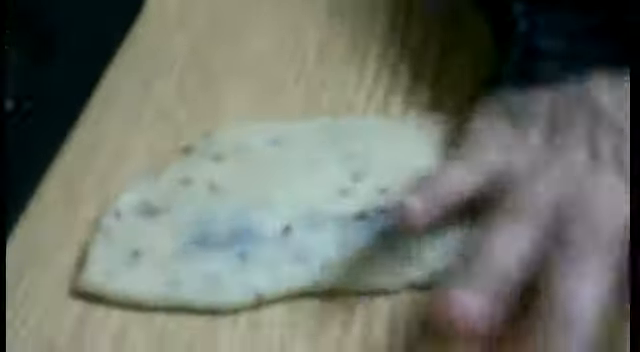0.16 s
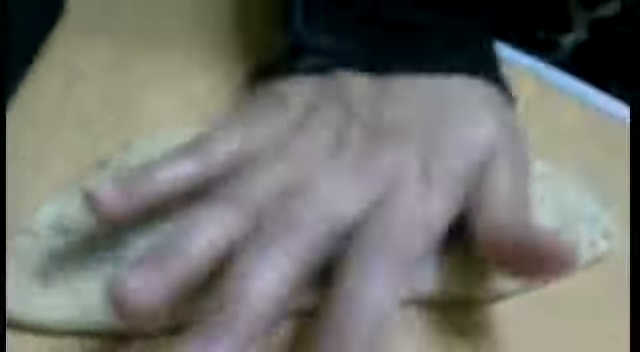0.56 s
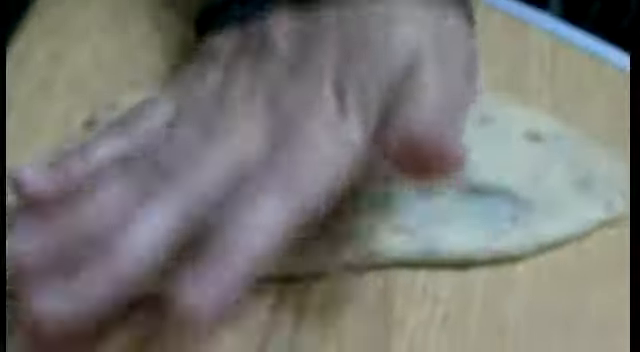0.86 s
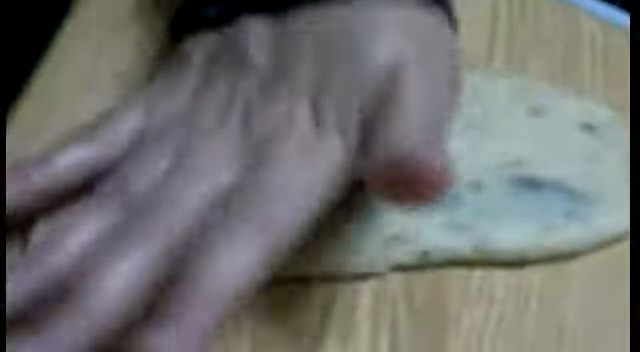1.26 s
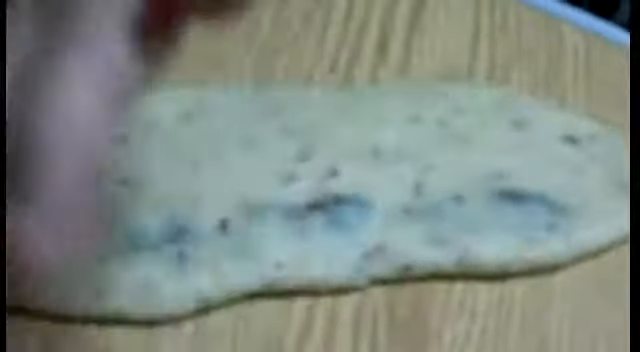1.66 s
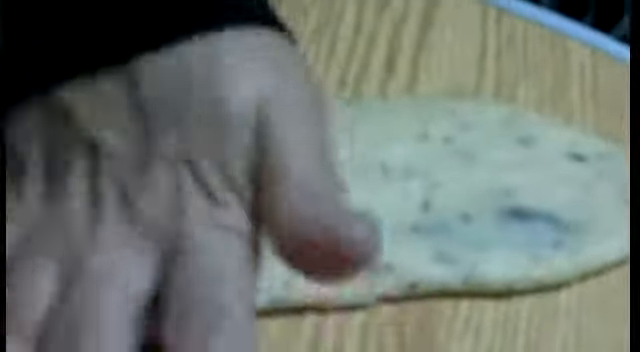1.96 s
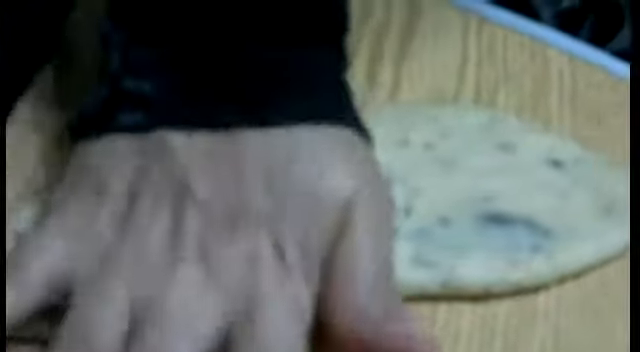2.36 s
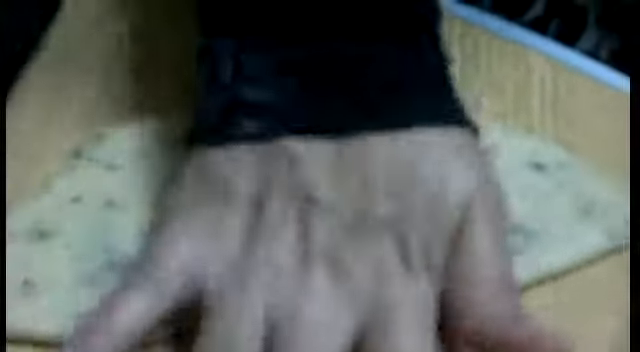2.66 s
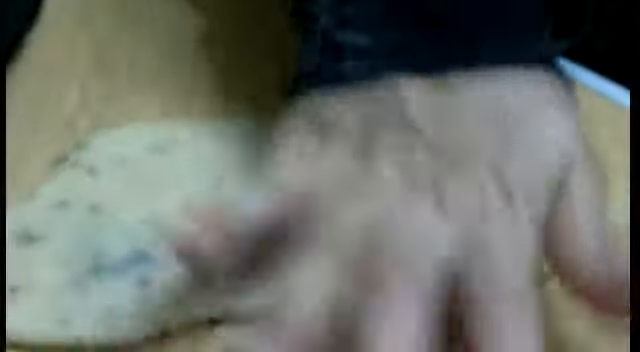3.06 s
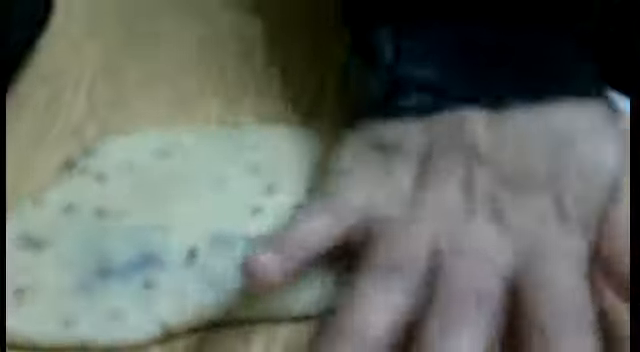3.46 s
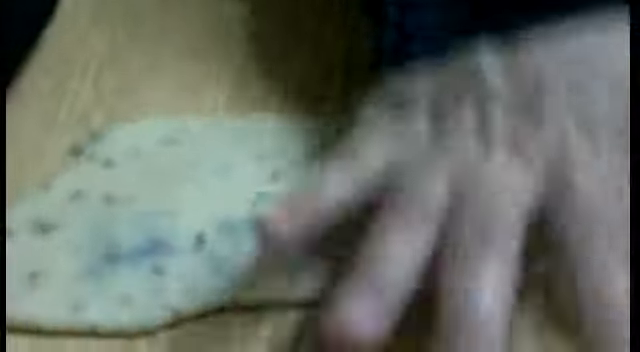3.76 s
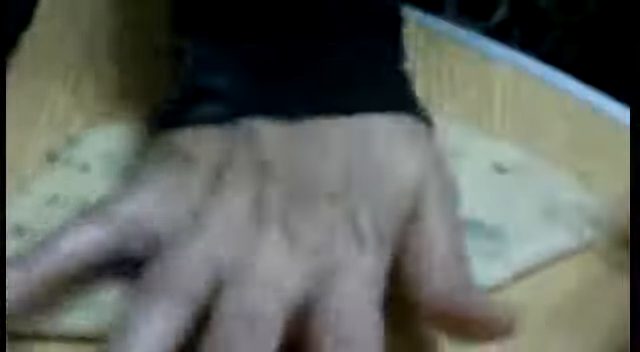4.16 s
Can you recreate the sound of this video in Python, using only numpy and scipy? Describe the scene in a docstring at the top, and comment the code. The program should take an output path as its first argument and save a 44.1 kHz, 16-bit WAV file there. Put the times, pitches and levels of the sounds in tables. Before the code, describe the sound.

A palm pats dough flat on a wooden board, about four times a second, heard close and mostly on the right in a small kitchen with short reverberation. From the start to about 0.8 seconds come four firm pats. Each is a low thud with a soft squash and a brief papery rub, doubled by a wooden knock or sharp clack as the board rocks on the worktop. From about 1 to 2.4 seconds the hand presses gently, giving quieter, duller thumps, faint ticks and a light rasp of skin over flour. At about 2.5 seconds a fingertip click and a strong slap bring back the hard patting, with six knocking, clacking pats up to about 3.9 seconds. A softer pat follows at around 4.1 seconds. Only very faint room noise lies underneath.

```python
"""A palm pats dough flat on a wooden board, about four times a second, in a small kitchen.
Each pat thuds, squashes the dough and rubs by stick-slip friction. The board rocks on the worktop and
rings in its modes: its heavy side knocks, and sharp clacks come mostly from its light edge, twice from
a fingertip. The hand presses gently through the middle stretch, then pats hard again.
Two close microphones hear it with short reverberation; the right one is much the louder."""
import sys
import numpy as np
from scipy import signal
from scipy.fft import rfft, irfft
from scipy.io import wavfile
from scipy.ndimage import uniform_filter1d, minimum_filter1d

SR = 44100
rng = np.random.default_rng(int(sys.argv[2]) if len(sys.argv) > 2 else 0)


def inscribe(sig):
    """Save sig as 16-bit PCM at rate SR to the path in sys.argv[1].

    A 1-D sig is mono; a 2-D sig holds one channel per row.
    Samples are clipped to [-1, 1] before scaling.
    """
    pcm = np.round(np.clip(np.atleast_2d(sig).T, -1, 1) * 32767)
    wavfile.write(sys.argv[1], SR, pcm.astype(np.int16))


N = 189559

# The pats. Each row: landing time, rocking-back time and stay in seconds, then levels in dB of
# landing force, rocking force, weight, landing rub, rocking rub, slide, fingertips and lift.
PATS = [(-.05, 0.0145, 0.043, -1, -5.5, 2, -20.5, -26, -19, -43, -51),
        (0.2174, 0.2819, 0.044, 5, -0.5, -3.5, -24, -27.5, -11, -32, -49),
        (0.4548, 0.5134, 0.052, 3, -0.5, -4.5, -23, -25.5, 0, -24.5, -48),
        (0.7017, 0.745, 0.067, -2.5, -8.5, -0.5, -36, -27, -15.5, -39.5, -64),
        (0.9604, 1.015, 0.0062, -31, -17.5, 4, -36.5, -37.5, -11, -43.5, -60),
        (1.141, 1.213, .035, -23.5, -17, 0.5, -43.5, -44.5, -38, -57, -66),
        (1.398, 1.4257, 0.019, -29, -17.5, 1.5, -45.5, -40.5, -40, -52, -67.5),
        (1.7574, 1.8487, 0.0059, -23.5, -14.5, 1.5, -44, -30, -11.5, -51.5, -68),
        (1.996, 2.0727, 0.027, -30.5, -12, -4.5, -43, -37, -16.5, -46, -53.5),
        (2.263, 2.3439, 0.018, -21, -8.5, 1, -35.5, -29.5, -13.5, -32, -66),
        (2.5334, 2.5938, 0.048, 6.5, -5, -1, -27, -24, -4, -29.5, -32.5),
        (2.784, 2.8512, 0.04, -2, -1, 0.5, -31, -28, -10.5, -29.5, -40.5),
        (3.0543, 3.1206, 0.041, 0, -2, 0.5, -33.5, -37, -21, -32.5, -40),
        (3.3101, 3.3732, 0.041, -1, -1, -3, -29, -32.5, -15.5, -28, -39),
        (3.5503, 3.613, 0.044, -3, -2.5, -1, -33.5, -38.5, -19, -31.5, -42.5),
        (3.8255, 3.8889, 0.046, -5, 1.5, -0.5, -33.5, -29.5, -24, -30.5, -58),
        (4.076, 4.1788, 0.019, -11, -15, 0, -37.5, -34.5, -18, -43, -79.5)]
# Friction spectrum of skin on dough. Each row, as in every spectrum here: frequency in Hz, level in dB.
RUB_SPECTRUM = [(200, -68.5), (900, 5.5), (1500, 10.5), (2100, 10.5), (2700, 8), (3300, -14.5), (4400, -31),
                (5500, -32), (8000, -46), (14000, -48)]


def undb(db):
    """Amplitude ratio for a level in decibels."""
    return 10 ** (np.asarray(db) / 20)


def unit(x):
    """Normalisation to an rms of 1."""
    return x / np.sqrt(np.mean(x ** 2))


def through(x, response):
    """A linear system convolves its input with its impulse response."""
    return signal.fftconvolve(x, response)[:len(x)]


def colour(spectrum, size=4096):
    """Minimum-phase impulse response of a spectrum, by folding the cepstrum onto positive time."""
    hz, db = np.transpose(spectrum)
    grid_hz = np.maximum(np.arange(size // 2 + 1) * SR / size, 1)
    magnitude = undb(np.interp(np.log(grid_hz), np.log(hz), db))
    cepstrum = irfft(np.log(magnitude))
    cepstrum[1:size // 2] *= 2
    cepstrum[size // 2 + 1:] = 0
    return irfft(np.exp(rfft(cepstrum)))


def noise(spectrum):
    """White noise filtered to a spectrum, at an rms of 1."""
    return unit(through(rng.standard_normal(N), colour(spectrum)))


def ring(modes):
    """Modal superposition: the impulse itself plus one damped cosine for each mode."""
    t = np.arange(SR // 2) / SR
    response = signal.unit_impulse(len(t))
    for hz, resonance_db, t60 in modes:
        rate = np.log(1000) / t60
        response += undb(resonance_db) * 2 * rate / SR * np.exp(-rate * t) * np.cos(2 * np.pi * hz * t)
    return response


def add(track, start_s, sound):
    """Superposition of a sound on a track."""
    i = int(np.clip(start_s * SR, 0, len(track) - 1))
    track[i:i + len(sound)] += sound[:len(track) - i]


def pressure(start, length, rise, fall, brush_db=-17, brush_s=0.014):
    """Contact pressure envelope, times in seconds: the hand brushes, bears down, holds and lets go."""
    t = np.arange(N) / SR - start
    brush = undb(brush_db) * np.exp(np.minimum(t, 0) / brush_s)
    release = np.exp(-np.maximum(t - length, 0) / fall)
    return np.maximum(np.clip(t / rise, 0, 1), brush) * release


def stick_slip(spread_db, rate_hz):
    """Stick-slip friction modulates amplitude at random, many times a second."""
    steps = np.clip(rng.standard_normal(N // 20), -1.5, 1.5)
    flicker = np.interp(np.arange(N) * rate_hz / SR, np.arange(len(steps)), steps)
    return unit(undb(spread_db * flicker))


def soften(x, cutoff_hz):
    """Contact time limits bandwidth: a softer contact lasts longer and acts as a low-pass."""
    return signal.sosfilt(signal.butter(4, min(cutoff_hz, 9000), fs=SR, output="sos"), x)


def disperse(x, centre_hz=1300, width_hz=1100):
    """Dispersion: bending waves cross the wood at different speeds, spreading a pulse (an all-pass)."""
    radius = np.exp(-np.pi * width_hz / SR)
    poles = np.array([1, -2 * radius * np.cos(2 * np.pi * centre_hz / SR), radius ** 2])
    return signal.lfilter(poles[::-1], poles, x)


def impacts(hits, pulse, rattle_db, rattle_s, typical_hz=3600):
    """Impact with rebound: tiny bounces follow each blow and last longer after a soft one."""
    track, t = np.zeros(N), np.arange(len(pulse)) / SR
    for start, db, cutoff_hz in hits:
        blow = soften(pulse, cutoff_hz)
        settle_s = rattle_s * typical_hz / cutoff_hz
        rebounds = rng.standard_normal(len(t)) * np.sqrt(t) * np.exp(-t / settle_s)
        rattle = through(blow, rebounds / np.linalg.norm(rebounds))
        add(track, start, undb(db) * (blow + undb(rattle_db) * rattle) / np.abs(blow).max())
    return track


def pushes(landing_share=0.48):
    """Load transfer: each pat pushes twice, as the palm lands and as it rocks back."""
    # Each row: knock time and hold in seconds, then force, weight, rub and slide in dB.
    rows = []
    for lands, rocks, stays, land_db, rock_db, weight_db, land_rub_db, rock_rub_db, slide_db, *_ in PATS:
        land_hold = landing_share * (rocks - lands)
        land_slide_db = slide_db - 7.5 + 0.4 * land_db  # less slide on landing, least when soft
        rows.append((lands, land_hold, land_db, weight_db, land_rub_db, land_slide_db))
        rows.append((rocks, stays, rock_db, weight_db + 0.5, rock_rub_db, slide_db))
    return rows


def microphone_hiss():
    """Self-noise: each of the two microphones adds its own uncorrelated hiss."""
    hiss_spectrum = [(20, 1.5), (200, 2), (1500, 4.5), (6000, -2.5), (11000, -7), (15000, -21)]
    return undb(-73) * np.array([noise(hiss_spectrum), noise(hiss_spectrum)])


def room_air():
    """Ambient noise: a steady floor, strongest in the low bass."""
    air_spectrum = [(20, -9.5), (50, 9), (100, -12), (160, -9), (230, -11), (600, -15.5), (1200, -20),
                    (2500, -41), (5000, -40), (11000, -56), (15000, -38)]
    return undb(-68) * noise(air_spectrum)


def suppress(x, crossover_hz=250, open_db=-36, slope=0.68, depth_db=-9):
    """Downward expansion: a noise suppressor turns down all but the bass while the sound is quiet."""
    bass = signal.sosfiltfilt(signal.butter(2, crossover_hz, fs=SR, output="sos"), x)
    upper = x - bass
    level = np.sqrt(np.abs(uniform_filter1d(upper ** 2, size=441)))
    return bass + upper * np.clip((level / undb(open_db)) ** slope, undb(depth_db), 1)


def left_microphone(x, lead_samples=10.5):
    """Path difference: the nearer microphone hears early; it is weak and has a rumble of its own."""
    spectrum_re_right = [(30, -9.5), (98, -15.5), (160, -17.5), (260, -16), (450, -18.5), (1100, -18),
                         (1830, -17), (3000, -21), (5000, -12.5), (12000, -15)]
    rumble_spectrum = [(20, 0.5), (90, -4.5), (200, -16), (500, -26), (2000, -48)]
    weak = suppress(through(x, colour(spectrum_re_right)))
    early = np.interp(np.arange(N) + lead_samples, np.arange(N), weak)
    return early + undb(-58.5) * noise(rumble_spectrum)


def kitchen(x, first_echo_s=0.011):
    """Diffuse reverberation: reflections off walls and cupboards decay exponentially, treble first."""
    # Each row: lower and upper band edge in Hz, 60 dB decay time in seconds, level in dB.
    bands = [(39.4, 310, 0.31, -11.5), (300, 1010, 0.36, -8), (1100, 2450, 0.31, -12),
             (2520, 48000, 0.049, -9)]
    t = np.arange(SR // 2) / SR
    response = np.zeros(len(t))
    for low_hz, high_hz, t60, db in bands:
        tail = rng.standard_normal(len(t)) * np.exp(-np.log(1000) * t / t60) * (t > first_echo_s)
        band = signal.butter(3, [low_hz, min(high_hz, 0.45 * SR)], "band", fs=SR, output="sos")
        response += undb(db) * signal.sosfilt(band, tail / np.linalg.norm(tail))
    return through(x, response)


def board_response():
    """Resonance: board and worktop ring in their normal modes."""
    # Each row: frequency in Hz, gain at resonance in dB, 60 dB decay time in seconds.
    modes = [(36.3, -1.5, 0.3), (101.5, 15, 0.28), (119.2, 6.5, 0.3), (195.2, 8, 0.25), (255.5, -3.5, .14),
             (344.4, -1.5, 0.37), (490, -6, 0.075), (567, 0.5, 0.026), (833, 8, 0.08), (922, -6, 0.43),
             (1050, 4, 0.084), (1354, -9.5, 0.089), (1773, -29.5, 0.33), (2070, -7, 0.14),
             (2860, -3.5, 0.015), (3280, -2.5, 0.12), (4004, -4.5, .08), (4080, -15, 0.3)]
    return ring(modes)


def lifts(board, delay_s=0.009):
    """Adhesion: skin peels off the dough in small slips as the hand rises."""
    peel = sum(undb(lift_db) * pressure(rocks + stays + delay_s, 0.022, rise=0.0086, fall=0.012)
               for _, rocks, stays, *_, lift_db in PATS)
    friction = noise(RUB_SPECTRUM) * stick_slip(spread_db=7, rate_hz=670)
    return peel * unit(through(friction, board))


def fingertips(lead_s=0.018):
    """Light impact: fingertips flick the dough ahead of the palm, each time a short noise burst."""
    touch_spectrum = [(60, -15), (250, -4), (900, 7), (2400, 9), (3200, -17.5), (4500, -17.5), (6000, -28),
                      (12000, -31.5), (15000, -32.5)]
    flicks = sum(undb(touch_db) * pressure(lands - lead_s, 0, rise=0.0012, fall=0.01, brush_db=-32)
                 for lands, *_, touch_db, _ in PATS)
    return flicks * noise(touch_spectrum)


def slides(board, lag_s=0.002):
    """Sliding friction over flour: a papery rasp through the board and a fine hiss above it."""
    rasp_spectrum = [(500, -35.5), (2200, -13), (3300, 18), (4200, 1.5), (5200, 1.5), (6200, -7.5),
                     (7300, -6), (8800, -34), (14000, -60.5)]
    hiss_spectrum = [(3000, -30), (6000, -6), (7300, -2), (8800, -18), (10300, -4), (11000, -9), (12200, 0),
                     (13200, -12), (14000, -27), (16000, -35)]
    rasp_gain, hiss_gain = np.zeros((2, N))
    for knock, hold, *_, slide_db in pushes():
        speed = pressure(knock + lag_s, hold, rise=0.007, fall=0.0037)
        rasp_gain += undb(-36 + slide_db) * speed
        hiss_gain += undb(-48 + 1.7 * slide_db) * speed
    slips = stick_slip(spread_db=4, rate_hz=400)
    rasp = rasp_gain * unit(through(noise(rasp_spectrum) * slips, board))
    return rasp + hiss_gain * noise(hiss_spectrum) * slips


def clacks():
    """Sharp impacts: mostly the board's light edge, twice a fingertip clicking just before a pat."""
    # Each row: start in seconds, level in dB, contact cutoff in Hz. Fingertips: 0.204 and 2.5196 s.
    hits = [(0.0767, -22, 2700), (0.092, -18.5, 2480), (0.204, -12.5, 2770), (0.2374, -6.5, 4000),
            (0.469, -4.5, 3440), (0.7217, -5.5, 3680), (0.7432, -5, 5100), (0.9525, -21.5, 2670),
            (0.993, -23, 3800), (1.1648, -15.5, 2240), (1.1786, -23.5, 4080), (1.7819, -20, 2000),
            (2.0236, -19.5, 2100), (2.282, -23, 2780), (2.5196, -12.5, 4270), (2.5489, -5, 3900),
            (2.584, -12.5, 5000), (2.6808, -11.5, 4300), (2.8008, -5.5, 3700), (2.8338, -14.5, 3600),
            (3.0728, -6.5, 3700), (3.3277, -13.5, 2910), (3.358, -16.5, 3900), (3.5646, -12.5, 3500),
            (3.8443, -9.5, 3060), (3.8764, -22, 3440)]
    clack_spectrum = [(25, -31), (300, 3.5), (700, 0), (1050, 0.5), (1500, 4.5), (2800, 3.5), (3600, 0),
                      (4500, -8), (5600, -13.5), (8000, -24.5), (14000, -37)]
    mode_hz, mode_db, mode_t60 = 1830, 8, 0.0047
    pulse = through(colour(clack_spectrum), ring([(mode_hz, mode_db, mode_t60)]))
    return impacts(hits, pulse, rattle_db=1, rattle_s=0.0022)


def knocks(brisk_hz=3800, brisk_rub_db=-33.5, octaves_per_db=0.1075):
    """Contact chatter: the heavy side lands several times; a brisk push rubs more and knocks brighter."""
    # Each row: delay in seconds, level in dB, contact cutoff in Hz.
    chatter = [(0, 0, 9000), (.00245, -7, 9000), (.00295, -5, 4000), (.00392, 0, 1500)]
    knock_spectrum = [(25, -4), (100, -0.5), (450, 9.5), (750, 3), (1050, 4.5), (1500, 4), (2100, 6.5),
                      (2800, -3), (4000, -13.5), (5500, -27), (8000, -35.5), (14000, -28)]
    contact = colour(knock_spectrum)
    pulse = np.zeros(len(contact))
    for delay, db, cutoff_hz in chatter:
        add(pulse, delay, undb(db) * soften(contact, cutoff_hz))
    hits = [(start, force_db, brisk_hz * 2 ** (octaves_per_db * (rub_db - brisk_rub_db)))
            for start, _, force_db, _, rub_db, _ in pushes() if start >= 0]
    return undb(-1) * disperse(impacts(hits, pulse, rattle_db=-5.5, rattle_s=0.0031))


def palm(board):
    """Forced vibration: soft weight, squashing dough and rubbing skin drive the board."""
    # Slow presses that do not rock the board. Each row: start and length in seconds, force and rub in dB.
    nudges = [(0.136, 0.038, -23, -42), (0.754, 0.031, -16, -50), (1.293, 0.056, -35, -75),
              (1.48, 0.022, -38, -75), (2.022, 0.056, -34, -63), (2.671, 0.048, -24, -34.5)]
    thud_spectrum = [(20, -46), (35, 3.5), (62, -4.5), (100, -3.5), (145, 0.5), (210, 6), (330, 0),
                     (600, -3), (1500, -57.5), (4000, -80)]
    squash_spectrum = [(60, 7.5), (250, -43), (450, -9.5), (620, 12.5), (850, -3), (1300, 10),
                       (2200, -15.5), (5000, -78.5)]
    scuff_spectrum = [(1500, -25), (2600, -5), (3300, 0), (3800, -4), (4250, -1), (4700, -15), (5400, -32),
                      (8000, -44), (14000, -50)]
    presses = [(start, length, force_db, 0, rub_db) for start, length, force_db, rub_db in nudges]
    for knock, hold, force_db, weight_db, rub_db, _ in pushes():
        lead_s = 0.013 * undb(-0.2 * force_db)  # a gentle palm bears down longer before the knock
        presses.append((knock - lead_s, lead_s + hold, force_db, weight_db, rub_db))
    weight, squash, rub = np.zeros((3, N))
    for start, length, force_db, weight_db, rub_db in presses:
        weight += undb(-25 + weight_db + 0.41 * force_db) * pressure(start, length, 0.014, 0.019)
        squash += undb(-30 + weight_db + 0.56 * force_db) * pressure(start, length, 0.0048, 0.015)
        rub += undb(rub_db) * pressure(start, length, 0.0081, 0.021)
    slips = stick_slip(spread_db=3.5, rate_hz=500)
    thud = weight * unit(through(noise(thud_spectrum), board))
    dough = squash * unit(through(noise(squash_spectrum), board))
    skin = rub * unit(through(noise(RUB_SPECTRUM) * slips, board))
    firmness = (rub / rub.max()) ** (7 / 8)  # only a firm rub has a papery top
    scuff = rub * firmness * unit(through(noise(scuff_spectrum) * slips, board))
    return thud + dough + undb(-6.5) * skin + undb(-7) * scuff


def scene():
    """Direct and reverberant sound of hand and board add at two close microphones."""
    board = board_response()
    clacking = through(clacks(), board)
    direct = through(knocks() + fingertips(), board) + clacking
    direct = direct + palm(board) + slides(board) + lifts(board)
    right = direct + undb(-4) * kitchen(direct) + room_air()
    # The left microphone catches further reflections and a larger share of the clacks.
    left = left_microphone(right + undb(1) * kitchen(direct) + undb(-19.5) * clacking)
    return np.array([left, right]) + microphone_hiss()


def record(dry, ceiling=0.85, bottom_hz=20, top_hz=15600):
    """Band and peak limiting: the recorder drops deep rumble, eases the loudest peaks and cuts the top."""
    body = signal.sosfilt(signal.butter(2, bottom_hz, "high", fs=SR, output="sos"), dry)
    allowed_gain = ceiling / np.maximum(np.abs(body).max(axis=0), ceiling)
    gain = uniform_filter1d(minimum_filter1d(allowed_gain, size=129), size=129)
    return signal.sosfilt(signal.ellip(8, 0.2, 70, top_hz, fs=SR, output="sos"), body * gain)


dry = scene()
out = record(dry)
inscribe(out)
```